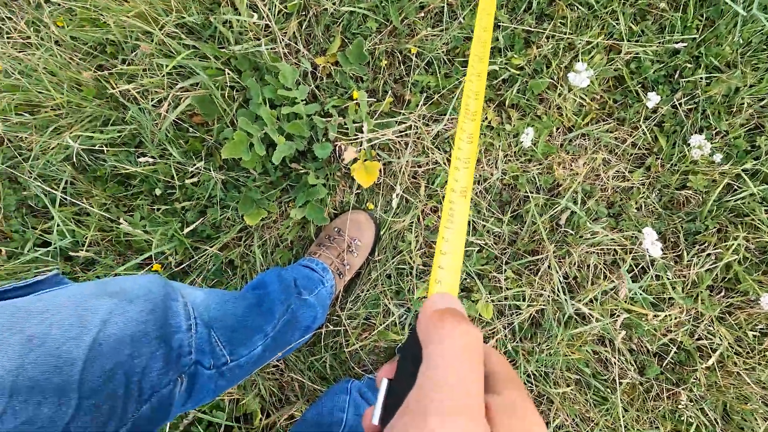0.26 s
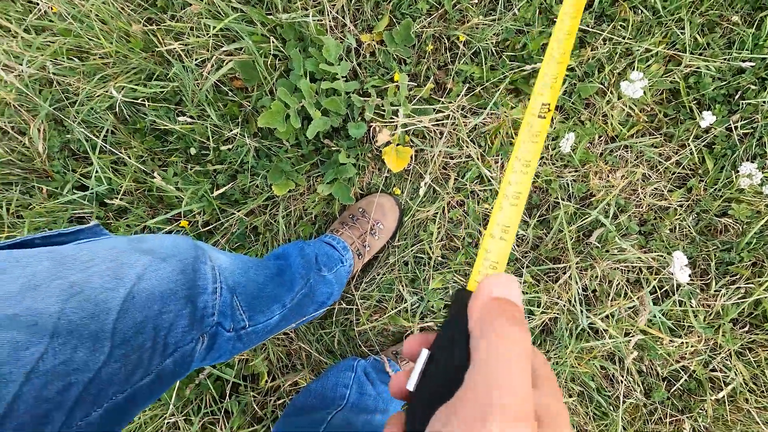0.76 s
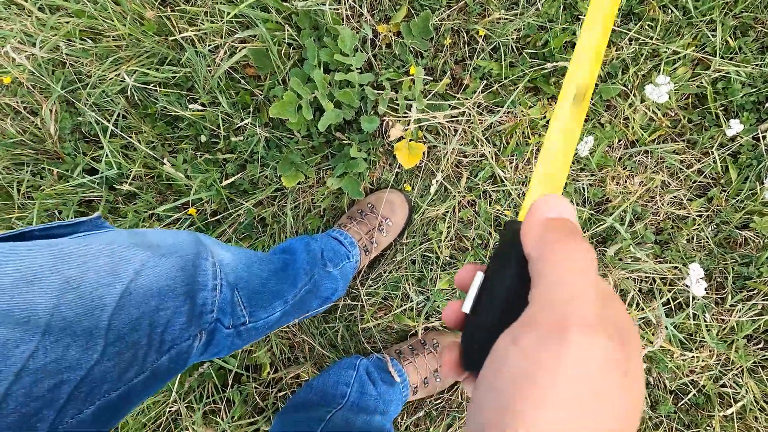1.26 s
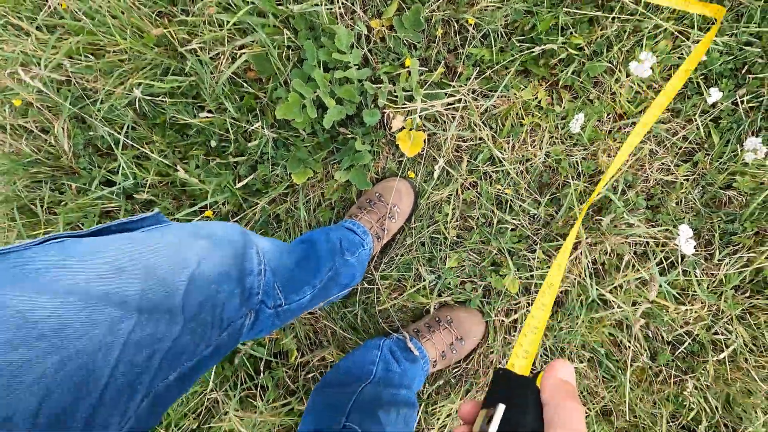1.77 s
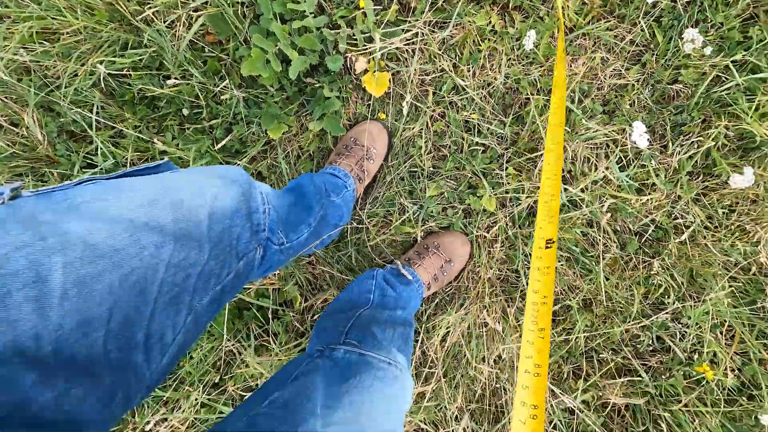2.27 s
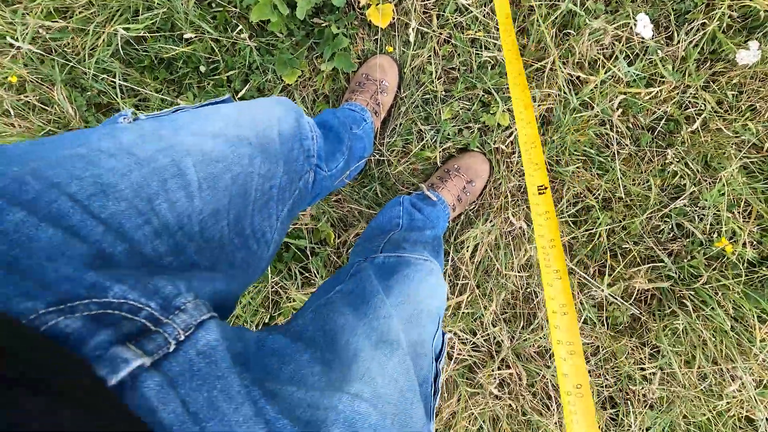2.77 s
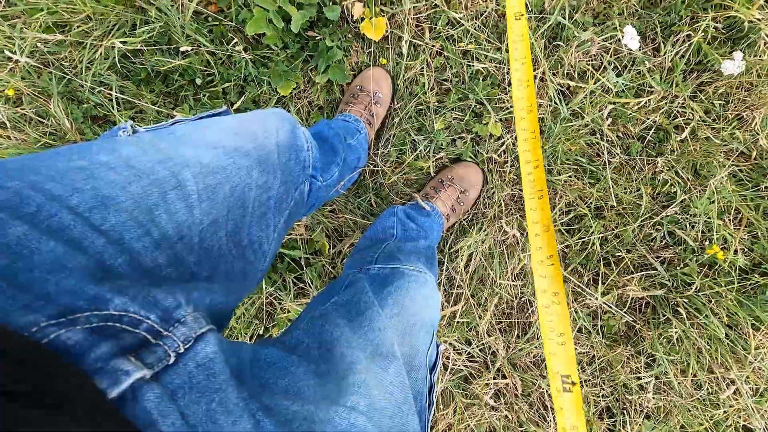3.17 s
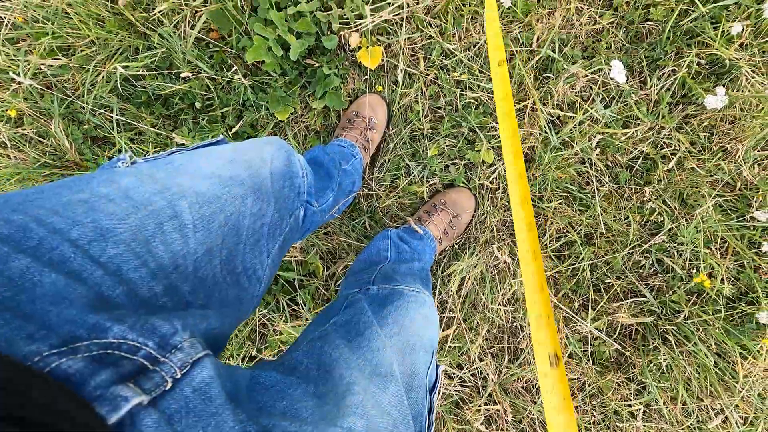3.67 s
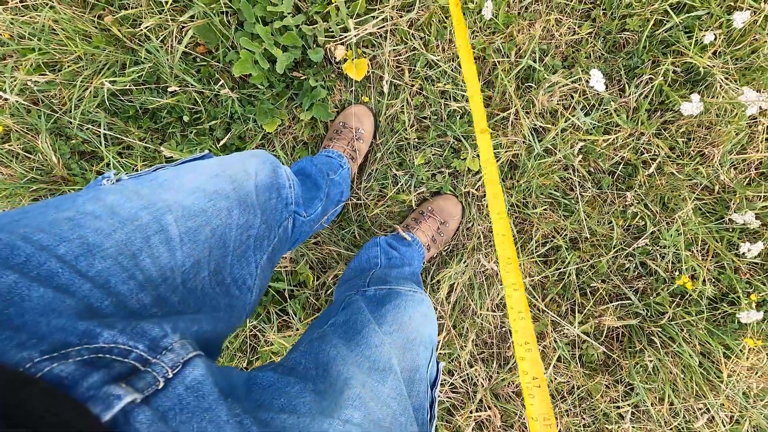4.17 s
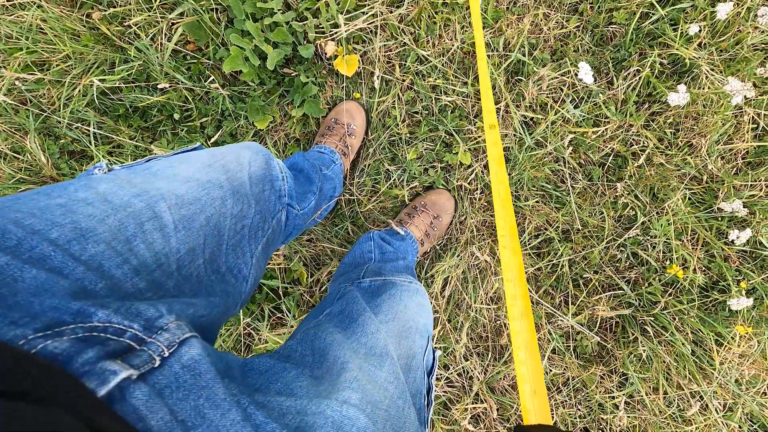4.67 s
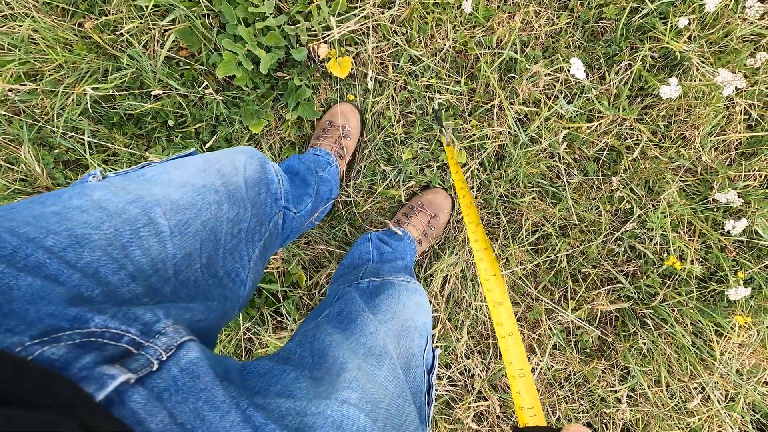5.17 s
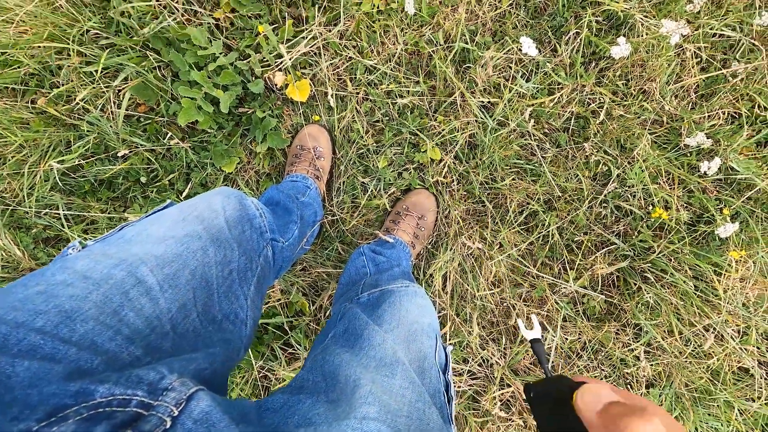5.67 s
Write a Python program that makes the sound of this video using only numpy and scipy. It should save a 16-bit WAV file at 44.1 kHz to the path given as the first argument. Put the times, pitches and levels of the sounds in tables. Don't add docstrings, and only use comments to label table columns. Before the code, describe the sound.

A steel tape measure is wound back into its plastic case outdoors, rattling, scraping and slapping in bursts before its hook snaps home.

```python
import sys
import numpy as np
from scipy import signal
from scipy.fft import rfft, irfft, next_fast_len
from scipy.io import wavfile
from scipy.ndimage import uniform_filter1d, map_coordinates

SR = 44100
rng = np.random.default_rng(int(sys.argv[2]) if len(sys.argv) > 2 else 0)


def amp(db):
    return 10 ** (np.asarray(db, float) / 20)


def write(x):
    x = np.atleast_2d(x).T
    wavfile.write(sys.argv[1], SR, np.round(np.clip(x, -1, 1) * 32767).astype(np.int16))


N = 261299

# (time [s], level [dB])
ROAD_DRONE = [(0.0, -49), (0.6, -49.5), (1.4, -45), (2.03, -59.5), (2.5, -47), (3.0, -52.5), (3.93, -47.5),
              (5.1, -53), (5.93, -48.5)]
# (time [s], level [dB])
TYRE_HISS = [(0, -41), (0.25, -38.5), (0.5, -41), (1.4, -41), (2.1, -48.5), (3.9, -36.5), (4.4, -42),
             (5.4, -46), (5.7, -42), (5.93, -49)]
# (frequency [Hz], level [dB per Hz])
DRONE_TONE = [(12, -42), (20, -6), (103, -19.5), (193, -3), (393, -10.5), (635, -26), (800, -15),
              (1040, -58), (1760, -120)]
# (frequency [Hz], level [dB per Hz])
HISS_TONE = [(350, -9), (600, -3.5), (694, -12.5), (1530, -4.5), (2070, -11), (5570, -25), (8940, -36.5),
             (11500, -39), (14000, -57)]
# (time [s], level [dB])
PUFFS = [
    (0.35, -64),
    (1.45, -47),
    (2.57, -67),
    (3.62, -60),
    (5.631, -49.5),
]

# (frequency [Hz], width [Hz], level [dB])
DRUM = [(2334, 510, 5.5), (2847, 296, 5.5), (3350, 430, -1.5), (1473, 455, -4)]
# (frequency [Hz], width [Hz], level [dB])
SHELL = [(300, 320, -4), (619, 102, 3), (842, 230, 1), (1170, 970, -4.5)]
# (frequency [Hz], width [Hz], level [dB])
GRIP = [(167, 50, -4), (344, 326, 4.5)]
# (frequency [Hz], width [Hz], level [dB])
MOUTH = [(4700, 1100, -2), (7000, 900, -4)]
# (frequency [Hz], level [dB])
STEEL = [(150, -31), (1000, -12.5), (2500, 5), (4000, 1.5), (7300, 5.5), (11000, -7), (13000, -12),
         (16000, -6)]

# (start [s], peak level [dB], pitch [Hz], time to the top [s])
PINGS = [(0.301, -22, 2600, .0008), (0.303, -16, 2700, .002), (0.3035, -18, 5100, .002),
         (0.304, -24, 3850, .003), (0.312, -28, 4400, .004), (0.338, -27, 2350, .002),
         (0.338, -28, 3100, .001), (0.359, -30, 1000, .0008), (0.443, -38, 3900, .001),
         (0.556, -27, 5600, .002), (0.579, -28, 5700, .002), (0.623, -15, 2500, .002),
         (0.633, -10, 2500, .0015), (0.666, -17, 950, .002), (0.673, -17, 950, .002),
         (0.725, -20, 650, .003), (0.742, -13, 1050, .003), (0.997, -20, 4200, .002),
         (1.053, -20, 4250, .004), (1.07, -20, 4250, .002), (1.079, -23, 4200, .003),
         (1.127, -14, 3850, .002), (1.155, -20, 650, .004), (1.192, -14, 2650, .002),
         (1.192, -17, 3600, .002), (1.228, -17, 2250, .003), (1.501, -12, 5400, .0015),
         (1.515, -12, 4200, .002), (2.428, -30, 1900, .001), (2.974, -13, 4300, .002),
         (2.992, -13, 2600, .002), (3.515, -17, 5000, .002), (3.537, -17, 4300, .002),
         (3.587, -16, 2250, .003), (3.595, -11, 2300, .003), (3.646, -12, 5700, .003),
         (3.653, -11, 5000, .002), (3.846, -22, 650, .003), (3.936, -14, 5600, .002),
         (4.025, -15, 2200, .0015), (4.16, -16, 2200, .002), (4.462, -12, 3000, .001),
         (4.56, -24, 3500, .002), (4.659, -28, 650, .002), (4.817, -14, 2300, .003),
         (4.835, -14, 5200, .003), (4.875, -18, 600, .002), (5.388, -20, 2650, .001),
         (5.4515, -15, 3200, .001), (2.79, -36, 2400, .006)]
# (time [s], peak level [dB], drum level [dB], shiver pitch [Hz], time to die 60 dB [s])
KINKS = [(0.3037, -17, -10, 4350, 0.094), (0.9975, -22.5, -4, 4000, 0.044),
         (1.051, -16.5, -17.5, 4100, 0.085), (1.2486, -15, 2.5, 4700, 0.021),
         (2.2685, -25.5, -9, 4220, 0.051), (2.7413, -27, -31, 4370, 0.19), (2.8188, -27, -24, 4360, 0.21),
         (2.957, -9.5, 2, 4030, 0.08), (3.279, -11.5, -9, 4200, 0.04), (4.151, -5, -16.5, 4070, 0.16),
         (4.192, -9, 1, 5000, 0.057), (4.443, -23.5, 1, 4260, 0.11), (4.939, -4.5, -20.5, 5400, 0.061),
         (5.0018, -19.5, 1, 5540, 0.049)]

# (time [s], peak level [dB], ring pitch [Hz], knock level [dB])
JOLTS = [(2.9583, -11, 2180, -26), (2.9702, -6, 4240, -12), (2.9891, -2.5, 3230, -35),
         (3.268, -15, 4270, -18.5), (3.5966, -8, 2300, -18), (3.874, 1, 2250, -18.5),
         (3.894, -6, 4540, -8.5), (4.1912, -4, 2980, -17), (4.4434, -11.5, 3060, -23.5),
         (4.9969, 0.5, 2040, -18.5), (5.2751, -4.5, 2650, -11), (5.3204, -22.5, 2620, -3)]
RATTLE = [(0.3033, -15, 2640, -10), (0.337, -17, 2200, -18), (0.5132, -18, 2700, -29),
          (0.5945, -14, 3120, -17), (0.6112, -12, 2750, -10), (0.6196, -7, 2600, -18.5),
          (0.631, -3, 2680, -13.5), (0.65, -15, 2300, -17), (0.6654, -6, 2640, -23.5),
          (0.6837, -4.5, 2640, -9), (0.9968, -13, 4140, -22), (1.0047, -16, 2400, -19),
          (1.0274, -27, 2570, -30), (1.052, -17, 4180, -24), (1.069, -10, 4260, -18.5),
          (1.1082, -3.5, 2530, -17), (1.1255, -10, 3920, -25), (1.2745, -22, 2820, -22),
          (1.5284, -7, 2150, -8), (1.5507, -7, 4400, -6.5)]
TICKS = [(1.927, -35, 2550, -38), (2.4278, -22.5, 1890, -13), (2.5306, -31.5, 4100, -16),
         (2.8601, -9.5, 2600, -29), (2.884, -25, 2600, -23.5), (3.2225, -18.5, 2500, -15.5),
         (3.4412, -8.5, 3200, -14.5), (3.4943, -3, 2020, -46), (4.561, -17.5, 3180, -34),
         (4.582, -27, 2170, -22), (4.6098, -11, 2390, -9), (4.676, -18, 2530, -19),
         (4.8152, -16, 2400, -15), (4.89, -2.5, 2630, -16), (5.1144, -20, 3010, -22),
         (5.228, -19.5, 2350, -22), (5.3622, -33, 2950, -10), (5.3881, -13.5, 2670, -12),
         (5.3972, -21, 2650, -9), (5.4105, -34, 2570, -22), (5.6785, -21, 3120, -10),
         (5.8346, -39, 2290, -24), (5.8611, -28, 2400, -31), (5.891, -31, 3150, -24)]
BUMPS = [
    (0.9505, -26, 4530, -22),
    (0.9624, -40, 2750, -15),
    (4.134, -19, 3870, -1.5),
    (4.8747, -22.5, 2100, 0),
    (5.699, -39, 2900, -17),
]
STRIKES = [
    (0.2995, -26, 2600, -10),
    (0.7418, -3, 2100, -8),
    (0.7445, -5, 2500, -12),
    (1.1918, -5, 2650, -12),
    (4.0248, -6, 3800, -20),
    (5.4515, -9, 3200, -22),
]
KNOCKS = [(0.6395, -11, 2400, -15), (0.652, -9, 2600, -12), (0.6822, -6, 2630, -15),
          (0.7066, -9, 3600, -13), (0.748, -12, 2600, -15), (1.0005, -15, 2500, -20),
          (1.007, -24, 2500, -20), (1.0155, -26, 2500, -20), (1.116, -11, 2600, -18),
          (1.2765, -8, 2500, -14), (1.604, -18, 2700, -20), (1.615, -18, 4000, -20),
          (2.238, -30, 5000, -25), (2.367, -30, 4300, -25), (2.8675, -21, 2400, -22),
          (2.899, -27, 2300, -20), (2.962, -8, 2300, -8), (3.625, -12, 3200, -20), (3.776, -18, 2300, -20),
          (4.423, -34, 3000, -20), (4.431, -32, 3200, -20), (4.45, -14, 2500, -15), (4.731, -20, 2500, -20),
          (4.758, -16, 3500, -20), (4.808, -15, 2300, -20), (5.3865, -24, 2700, -15),
          (5.4065, -32, 3000, -20), (5.4135, -33, 2500, -20), (5.046, -14, 5200, -20),
          (5.686, -35, 2500, -20), (5.726, -46, 4300, -20), (5.742, -46, 3200, -20),
          (5.865, -33, 2800, -20)]
# (blows, thump level [dB], snap level [dB])
CONTACTS = [(JOLTS, -19.5, -2), (RATTLE, -34, -24), (TICKS, -33.5, -18),
            (BUMPS, -30, -24), (STRIKES, -40, -20), (KNOCKS, -36, -22)]

# (frequency [Hz], level [dB], time to die 60 dB [s])
HOOK_RINGS = [(705, 2, 0.019), (1100, -3.5, 0.018), (2250, 4.5, 0.021), (3540, 4, 0.013),
              (5300, -12, 0.025), (6430, -5, 0.02), (8100, -26, 0.019), (11200, -44, 0.026)]

# (peak time [s], scrape level [dB], time to rise 20 dB [s], time to fall 20 dB [s], brightness [dB])
PULLS = [(0.08, -60, 0.05, 0.06, 0), (0.22, -60, 0.1, 0.12, 0), (0.38, -54, 0.06, 0.1, -4),
         (0.5, -48, 0.04, 0.06, 0), (0.562, -32, 0.055, 0.1, -2), (0.6, -33, 0.05, 0.1, -4),
         (0.631, -27, 0.05, 0.12, -5), (0.665, -25, 0.03, 0.04, -4), (0.715, -20, 0.05, 0.045, -3),
         (0.76, -24, 0.015, 0.12, -3), (0.844, -36, 0.1148, 0.2, -8), (1.02, -37, 0.03, 0.08, -10),
         (1.08, -31, 0.07, 0.1, -7), (1.115, -25, 0.015, 0.12, -5.5), (1.16, -25, 0.05, 0.04, -0.5),
         (1.225, -27, 0.05, 0.06, -7), (1.26, -20, 0.016, 0.09, 1), (1.335, -17.5, 0.09, 0.1, 4),
         (1.385, -15, 0.08, 0.1, 6), (1.435, -15, 0.08, 0.07, 8), (1.46, -21, 0.04, 0.05, -7),
         (1.49, -16.5, 0.08, 0.08, 3), (1.531, -15.5, 0.07, 0.12, 2), (1.64, -34, 0.2, 0.2, -4)]
SLACK = [(1.687, -24.5, 0.026, 0.11, -1), (1.73, -29.5, 0.07, 0.08, -2), (1.834, -32.5, 0.063, 0.093, 4.5),
         (1.931, -30.5, 0.042, 0.096, -3), (2.02, -48, 0.2, 0.13, -8), (2.214, -42.0, 0.089, 0.15, 8.5),
         (2.378, -37.5, 0.071, 0.13, 4), (2.462, -41.5, 0.042, 0.027, 6.2), (2.53, -51.5, 0.2, 0.43, -1.5),
         (2.662, -45, 0.067, 0.081, 8)]
TURNS = [(2.93, -26.5, 0.08, 0.29, 0), (2.995, -15, 0.058, 0.06, 7), (3.02, -19, 0.04, 0.07, 6),
         (3.125, -39, 0.0092, 0.078, 6.5), (3.301, -28, 0.092, 0.11, 2.7), (3.444, -26.5, 0.057, 0.013, 5),
         (3.524, -20.5, 0.088, 0.094, 4.5), (3.595, -20, 0.039, 0.33, 1), (3.645, -16, 0.011, 0.057, 9.5),
         (3.68, -28, 0.05, 0.1, -4), (3.774, -30.5, 0.11, 0.16, 10.5), (3.83, -30, 0.06, 0.05, -9),
         (3.899, -17, 0.06, 0.07, 8), (3.94, -20.5, 0.05, 0.15, 0), (4.021, -28.2, 0.082, 0.076, -6),
         (4.113, -26.5, 0.058, 0.081, -1.5), (4.225, -15.5, 0.075, 0.12, 8.5), (4.32, -35, 0.06, 0.07, -12)]
LAST = [(4.46, -21, 0.023, 0.087, 3.5), (4.562, -46, 0.28, 0.41, -5.5), (4.671, -34, 0.01, 0.028, -0.5),
        (4.77, -25.5, 0.087, 0.047, 6.5), (4.836, -20, 0.034, 0.025, 4.5), (4.897, -29.5, 0.3, 0.048, 1),
        (5.01, -27, 0.012, 0.04, 4), (5.052, -24, 0.05, 0.051, 7), (5.115, -34, 0.11, 0.12, -5.5),
        (5.246, -40.5, 0.14, 0.084, -3.5), (5.275, -25, 0.0054, 0.035, 3), (5.43, -49, 0.06, 0.06, -8),
        (5.5, -37, 0.07, 0.1, -2), (5.598, -32, 0.08, 0.037, -5.5)]
SETTLE = [
    (5.625, -36, 0.01, 0.02, -4),
    (5.65, -46, 0.03, 0.05, -4.5),
    (5.75, -62, 0.1, 0.12, -6),
    (5.87, -62.5, 0.05, 0.06, -12),
]
# (surges, drum level re scrape [dB], shell level re scrape [dB])
STAGES = [(PULLS, -11, -16), (SLACK, -10.5, -22.5), (TURNS, -6, -17.5), (LAST, -1, -11.5), (SETTLE, 1.4, -8)]
# (start [s], end [s], drum level [dB], shell level [dB])
SHAKES = [
    (0.609, 0.783, -28, -31),
    (1.108, 1.228, -28, -33.5),
    (1.247, 1.354, -22.5, -27),
    (1.369, 1.556, -29, -27.5),
]

# (frequency [Hz], side level re mid [dB])
SIDE_TONE = [(25, -5), (120, -24), (700, -29), (2800, -32), (8000, -28), (10500, -18.5), (12500, -2),
             (14000, -7)]
# (frequency [Hz], level [dB])
CAVITY = [(6800, 0.5), (8200, -4.5), (9400, -5.5), (11000, 2), (13000, -1)]
# (frequency [Hz], level [dB])
ROLL_OFF = [(12800, -0.5), (13500, -16.5), (14000, -43), (16300, -64), (16500, -103)]

SPLIT_HZ = 9000


def unit(x):
    return x / np.sqrt(np.mean(x ** 2) + 1e-20)


def peak(x):
    return x / np.abs(x).max()


def along(points, hz):
    f, db = np.transpose(points)
    return amp(np.interp(np.log(hz + 1), np.log(f + 1), db))


def curve(points):
    s, db = np.transpose(points)
    return np.interp(np.arange(N) / SR, s, db)


def wobble(rate):
    knots = rng.standard_normal(int(N * rate / SR) + 4)
    return map_coordinates(knots, [np.arange(N) * rate / SR])


def filtered(x, response):
    m = next_fast_len(x.shape[-1] + 8192)
    return irfft(rfft(x, m) * response(np.fft.rfftfreq(m, 1 / SR)), m)[..., :x.shape[-1]]


def modes(table):
    def response(f):
        total = 0
        for k, (hz, width, db) in enumerate(table):
            total = total + (-1) ** k * amp(db) * 1j * f * width / (hz * hz - f * f + 1j * f * width)
        return total
    return response


def place(out, start_s, sound):
    out[round(start_s * SR):][:len(sound)] += sound


def traffic():
    drone = unit(filtered(rng.standard_normal(N), lambda f: along(DRONE_TONE, f)))
    hiss = unit(filtered(rng.standard_normal(N), lambda f: along(HISS_TONE, f)))
    drone_level = amp(curve(ROAD_DRONE) - 6.0 + 1.8 * wobble(1.94))
    hiss_level = amp(curve(TYRE_HISS) - 8.5 + 1.5 * wobble(11.0))
    return drone_level * drone + hiss_level * hiss


def puffs():
    puff_s, puff_hz = 0.028, 95
    s, db = np.transpose(PUFFS)[..., None]
    swell = (amp(db) * np.exp(-((np.arange(N) / SR - s) / puff_s) ** 2)).sum(axis=0)
    return swell * unit(filtered(rng.standard_normal(N), lambda f: modes([(puff_hz, 90, 0)])(f) ** 2))


def pings():
    out, t = np.zeros(N + SR), np.arange(SR // 20) / SR
    drifts = rng.standard_normal((len(PINGS), len(t)))
    for (s, db, hz, top), drift in zip(PINGS, drifts):
        swell = t / top * np.exp(1 - t / top)
        tone = np.sin(2 * np.pi * hz * t + 0.09 * drift.cumsum())
        place(out, s, amp(db - 5) * swell * tone)
    return out[:N]


def shivers():
    rise_s = 0.00023
    out, t = np.zeros(N + SR), np.arange(SR // 4) / SR
    noises = rng.standard_normal((len(KINKS), 2, len(t)))
    for (s, db, drum_db, shiver_hz, t60), (a, b) in zip(KINKS, noises):
        fade = amp(-60 * t / t60) * (1 - np.exp(-t / rise_s))
        shiver = filtered(a * fade, lambda f: along(STEEL, f) * (0.42 + modes([(shiver_hz, 1100, 0)])(f)))
        drum = filtered(b * fade, lambda f: modes(DRUM)(f) + amp(4.0) * modes(SHELL)(f))
        place(out, s, amp(db - 1.5) * (peak(shiver) + amp(drum_db + 1.0) * peak(drum)))
    return out[:N]


def slaps():
    out, t = np.zeros(N + SR), np.arange(SR // 12) / SR
    push = np.sin(np.pi * np.minimum(t / 0.00095, 1))
    jolt = peak(filtered(push, modes(GRIP)))
    for blows, thump_db, snap_db in CONTACTS:
        for s, db, ring_hz, knock_db in blows:
            a, b = rng.standard_normal((2, len(t)))
            contact = a * (np.exp(-(t / 0.0023) ** 3) + 0.22 * amp(-60 * t / 0.039))
            contact = contact + 2.65 * (t < 0.00015)
            plate = modes([(ring_hz, 500, 6), (1.37 * ring_hz, 900, 4), (4700, 1800, 2.5), (6500, 1500, -2)])
            ring = filtered(contact, lambda f: plate(f) + 0.3 * modes(DRUM)(f))
            snap = filtered(b * amp(-60 * t / 0.052), lambda f: along(STEEL, f))
            knock = filtered(push + 0.198 * contact, modes(SHELL + [(1200, 700, 5)]))
            body = amp(knock_db - 3) * peak(knock) + amp(thump_db + 8.0) * jolt
            place(out, s, amp(db + 1.0) * (0.74 * peak(ring) + amp(snap_db - 14) * peak(snap) + body))
    return out[:N]


def hook():
    drag_s, drag_db = 5.605, -15
    slam_s, slam_db = 5.6152, -7.5
    out, t = np.zeros(N + SR), np.arange(SR // 10) / SR
    scuff = rng.standard_normal(len(t)) * (t < slam_s - drag_s)
    drag = filtered(scuff, modes([(2060, 840, 1), (3570, 2400, -5.5)]))
    ring = 0
    for k, (hz, db, t60) in enumerate(HOOK_RINGS):
        ring = ring + (-1) ** k * amp(db - 60 * t / t60) * np.sin(2 * np.pi * hz * t)
    choke = np.exp(-(t / 0.0036) ** 3) + 0.12
    crack = 0.45 * amp(-60 * t / 0.0076) * rng.standard_normal(len(t))
    place(out, drag_s, amp(drag_db) * peak(drag) * 2)
    place(out, slam_s, amp(slam_db) * (ring * choke + crack))
    out = filtered(out, lambda f: (1j * f / (220 + 1j * f)) ** 2)
    place(out, slam_s, amp(-29) * peak(filtered(np.exp(-t / 0.0015), modes(GRIP))))
    return out[:N]


def surges():
    shape = 1.45
    swish_db, swish_fades = -11.5, 1.42
    drum_dulls = 0.94
    shake_edge_s = 0.0091
    t, total = np.arange(0, N + 64, 64) / SR, 1e-12
    for rows, drum_db, shell_db in STAGES:
        s, db, rise, fall, bright_db = np.transpose(rows)[..., None]
        fade_db = 20 * np.where(t < s, (s - t) / rise, (t - s) / fall) ** shape
        power = amp(db - fade_db) ** 2
        swish = amp(db + swish_db + bright_db - swish_fades * fade_db) ** 2
        case_db = -drum_dulls * bright_db
        drum = power * amp(case_db + drum_db) ** 2
        shell = power * amp(case_db + shell_db) ** 2
        total = total + np.sum([power, swish, drum, shell, power * bright_db], axis=1)
    for start, end, drum_db, shell_db in SHAKES:
        outside = np.maximum(4 * (start - t), t - end).clip(0)
        total[2:4] += amp(np.array([[drum_db], [shell_db]]) - 20 * outside / shake_edge_s) ** 2
    total[4] /= total[0]
    return [np.interp(np.arange(N) / SR, t, row) for row in total]


def rub(rate, spread_db, clump_db, smooth):
    impacts = (rng.random(N) < rate / SR) * amp(spread_db * rng.standard_normal(N).clip(-2, 2))
    chatter = np.sqrt(abs(uniform_filter1d(impacts ** 2, size=24)))
    rattle = chatter * rng.standard_normal(N)
    clumps = amp(clump_db * wobble(90))
    return unit(clumps * (unit(rattle) + smooth * rng.standard_normal(N)))


def chinks(centre_hz, spread, cycles, size_db, count):
    at = rng.integers(0, N, count)
    pitch, size = rng.standard_normal((2, count))
    steps = np.arange(200)
    turns = (centre_hz[at] * np.exp(spread * pitch.clip(-2, 2)))[:, None] * steps / SR
    fade = np.exp(-turns / cycles) * (1 - np.exp(-turns))
    rings = amp(size_db * size)[:, None] * np.sin(2 * np.pi * turns) * fade
    places = at[:, None] + steps
    return unit(np.bincount(places.ravel(), rings.ravel(), N + 200)[:N])


def patchy(x, depth_db):
    z = signal.stft(x, nperseg=256)[2]
    field = uniform_filter1d(rng.standard_normal(z.shape), size=5, axis=0)
    field = uniform_filter1d(field, size=12, axis=1)
    return unit(signal.istft(z * amp(depth_db * unit(field)), nperseg=256)[1][:N])


def reel():
    *powers, bright_db = surges()
    scrape, swishing, drumming, shelling = np.sqrt(powers)
    loud_db = 20 * np.log10(scrape).clip(-3, 0) + 30
    blade_hz = 4700 + 21.5 * loud_db + 58 * bright_db
    force = rub(rate=900, spread_db=1, clump_db=1.5, smooth=1.0)
    hiss = unit(filtered(force, lambda f: along(STEEL, f) * (0.6 + abs(modes(MOUTH)(f))) * (f < SPLIT_HZ)))
    swish = unit(filtered(force, lambda f: along(STEEL, f) * (f >= SPLIT_HZ)))
    rings = chinks(blade_hz, spread=0.206, cycles=13.0, size_db=-3.0, count=12000)
    grit = chinks(blade_hz, spread=0.29, cycles=1.6, size_db=4.0, count=2500)
    knocks = rub(rate=1200, spread_db=2, clump_db=1, smooth=0.8)
    drum = unit(filtered(0.094 * force + knocks, modes(DRUM)))
    shell = unit(filtered(knocks, lambda f: modes(SHELL)(f) * modes([(680, 700, 0)])(f)))
    blade = scrape * (patchy(0.53 * hiss + 0.71 * rings, depth_db=1.25) + 0.4 * grit)
    case = drumming * patchy(drum, depth_db=1.8) + shelling * patchy(shell, depth_db=3.0)
    return blade + swishing * swish + case


def scene():
    mid = traffic() + puffs() + pings() + shivers() + slaps() + hook() + reel()
    apart = signal.hilbert(filtered(mid, lambda f: along(SIDE_TONE, f)), next_fast_len(N))[:N]
    shadow = filtered(apart.real, lambda f: f > SPLIT_HZ)
    side = np.real(apart * np.exp(2.5j * wobble(40))) - 0.4 * shadow
    return np.array([mid + side, mid - side])


def top_cut(x):
    return signal.sosfilt(signal.butter(12, 16460, fs=SR, output="sos"), x)


def record(dry):
    notch_hz, bass_hz = 9020, 48

    def port(f):
        gap = notch_hz ** 2 - f * f
        notch = (gap + 1j * f * 60) / (gap + 1j * f * 900)
        return along(CAVITY, f) * notch * (1j * f / (bass_hz + 1j * f)) ** 2

    x = filtered(dry, port)
    x = x / (1 + np.abs(x / 1.1) ** 8) ** (1 / 8)
    mix = filtered(x, lambda f: along(ROLL_OFF, f)).clip(-1, 1)
    return top_cut(mix)


dry = scene()
out = record(dry)
write(out)
```